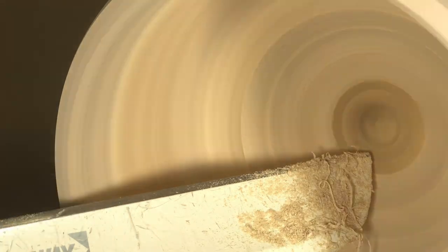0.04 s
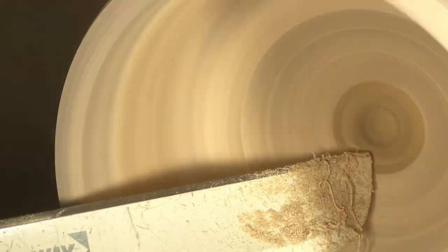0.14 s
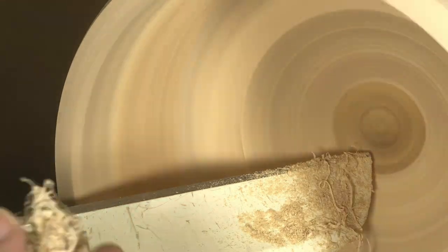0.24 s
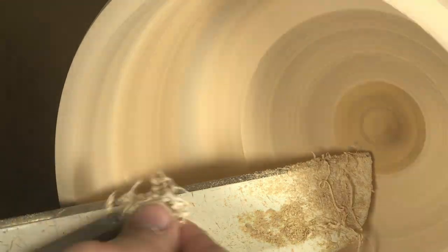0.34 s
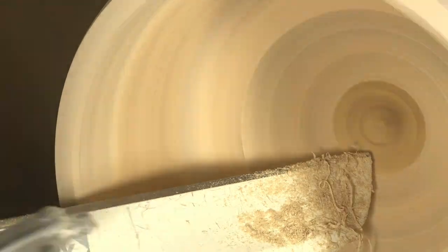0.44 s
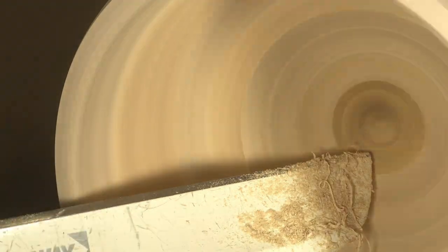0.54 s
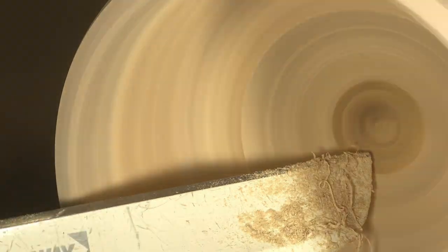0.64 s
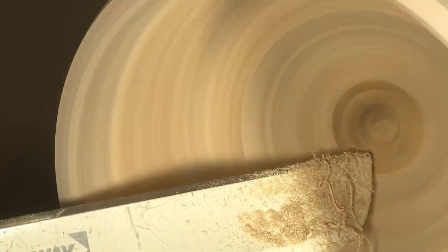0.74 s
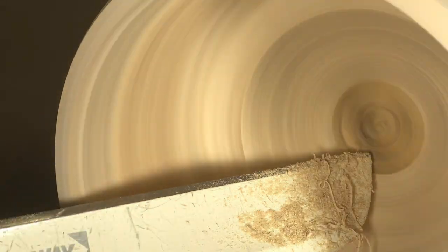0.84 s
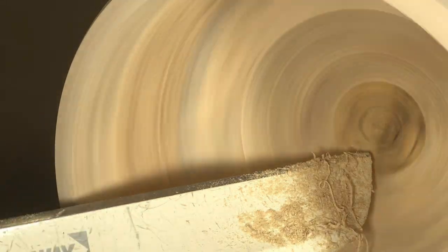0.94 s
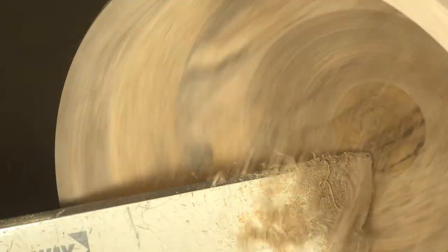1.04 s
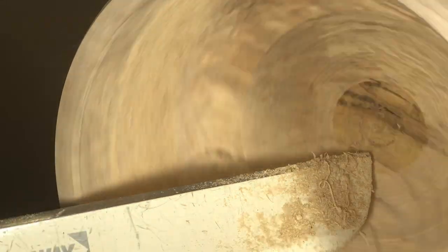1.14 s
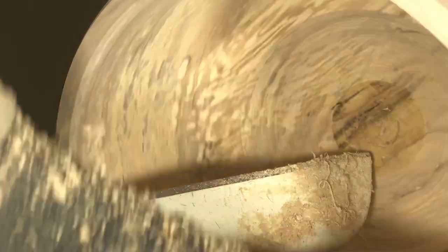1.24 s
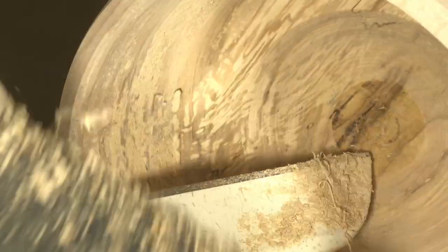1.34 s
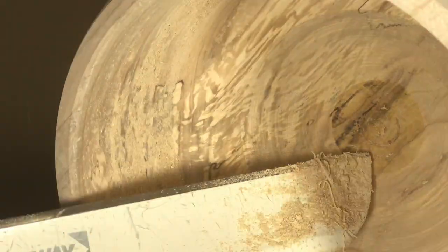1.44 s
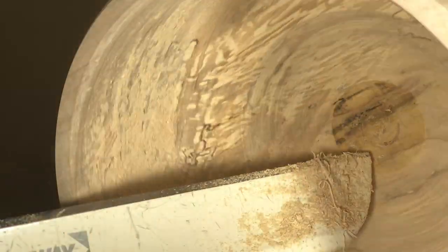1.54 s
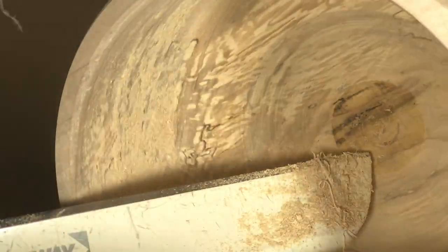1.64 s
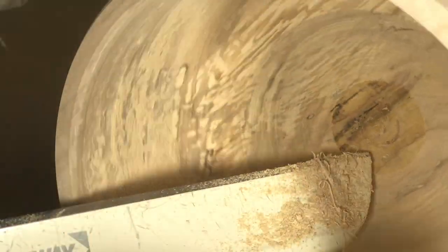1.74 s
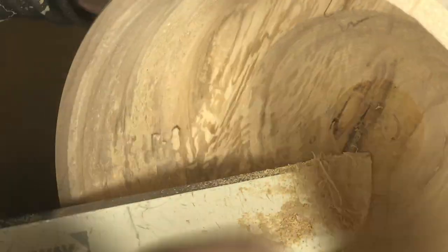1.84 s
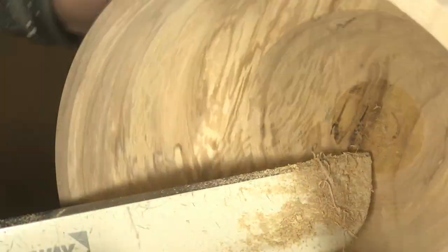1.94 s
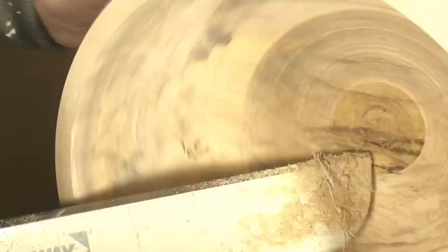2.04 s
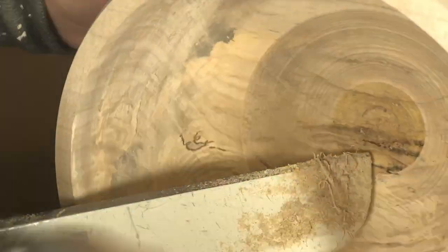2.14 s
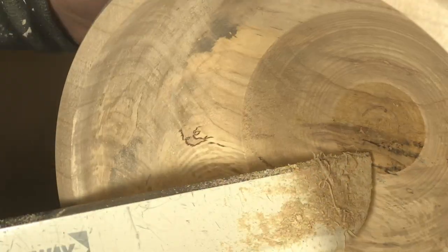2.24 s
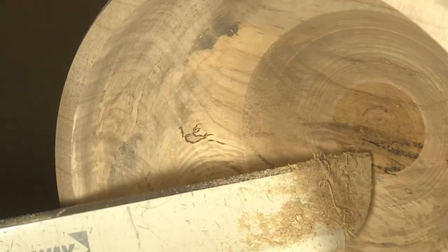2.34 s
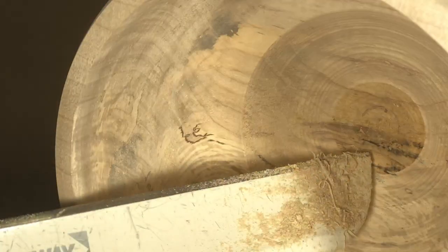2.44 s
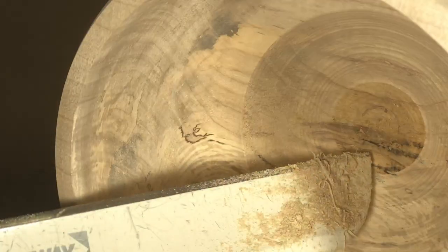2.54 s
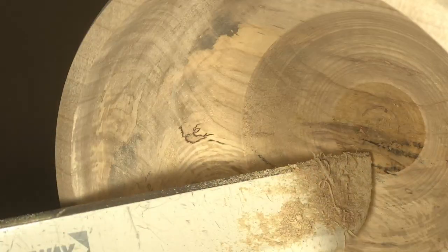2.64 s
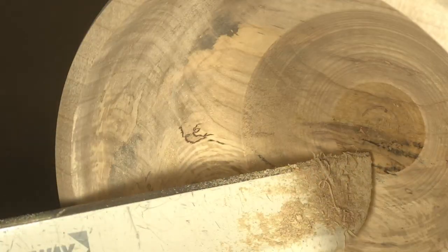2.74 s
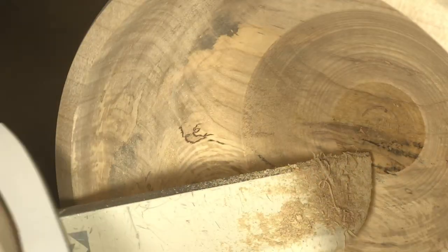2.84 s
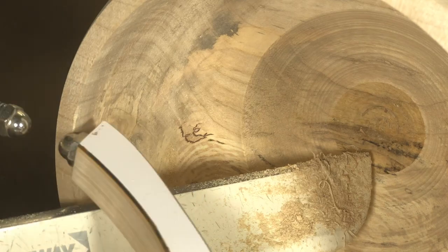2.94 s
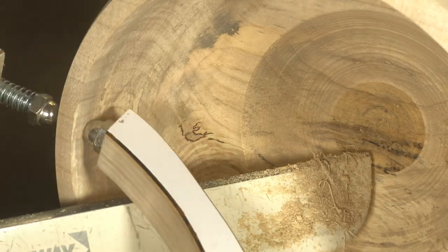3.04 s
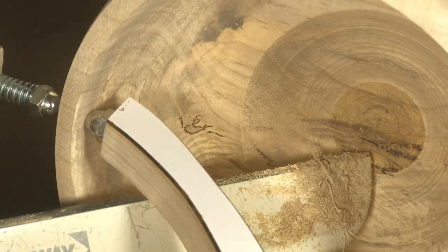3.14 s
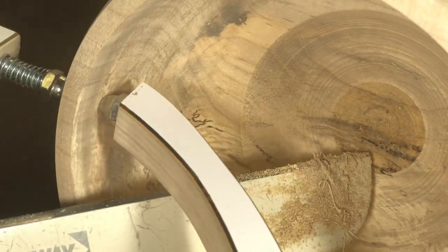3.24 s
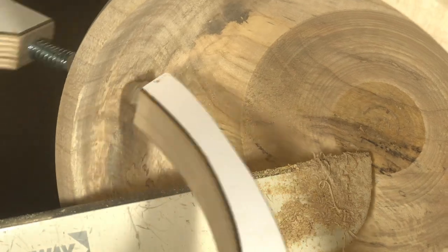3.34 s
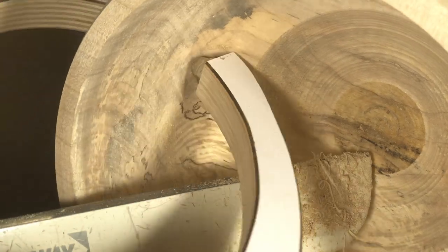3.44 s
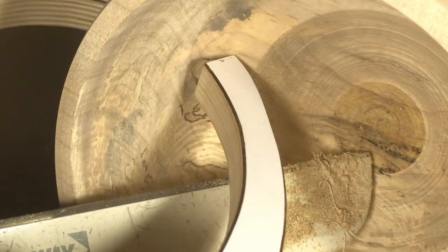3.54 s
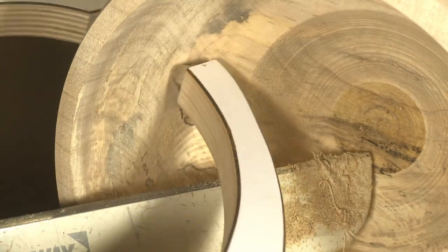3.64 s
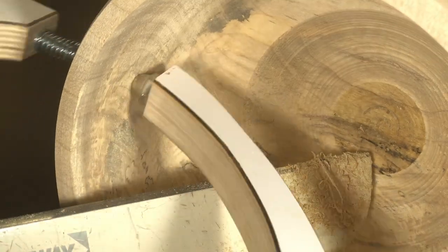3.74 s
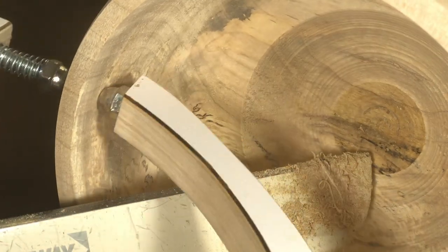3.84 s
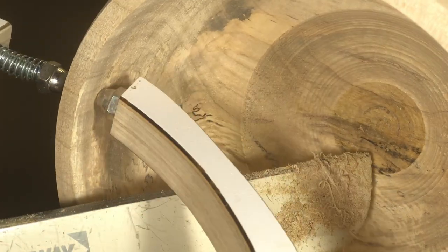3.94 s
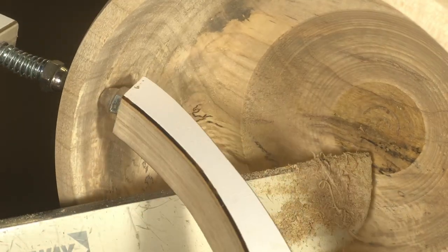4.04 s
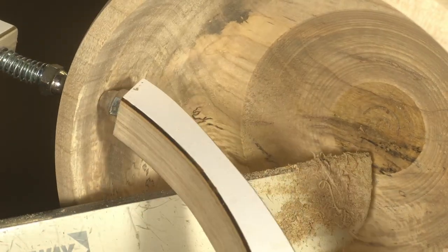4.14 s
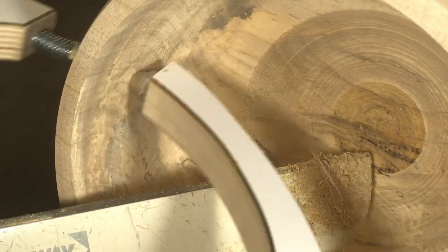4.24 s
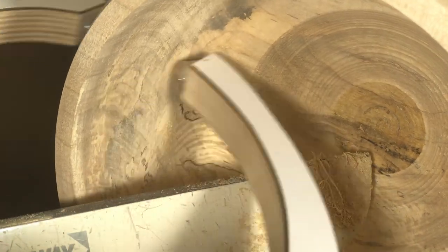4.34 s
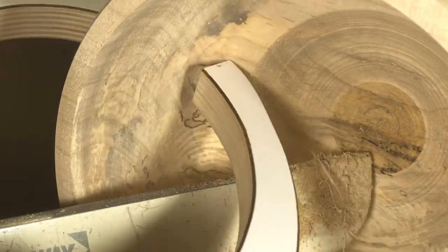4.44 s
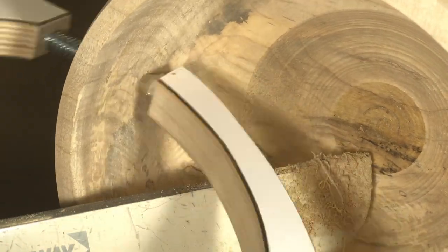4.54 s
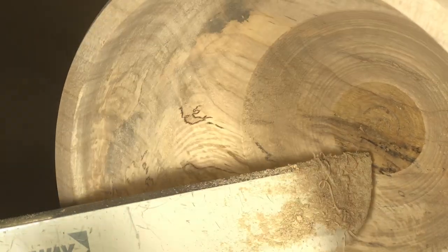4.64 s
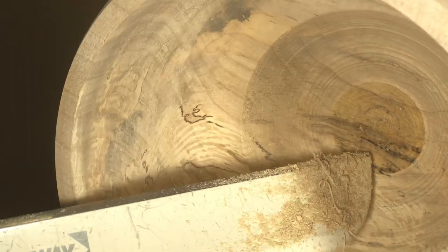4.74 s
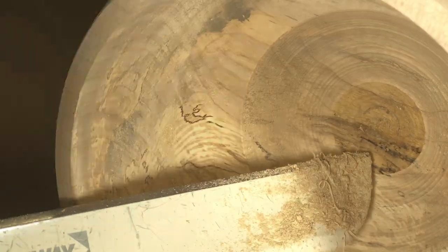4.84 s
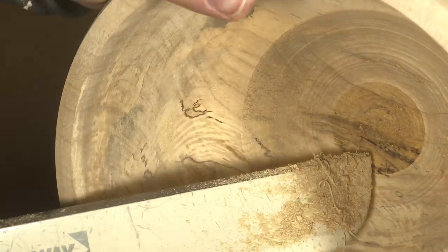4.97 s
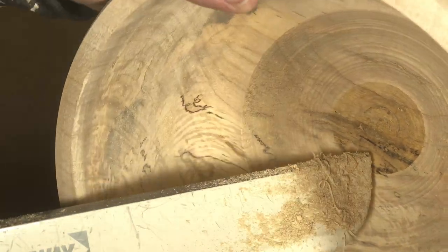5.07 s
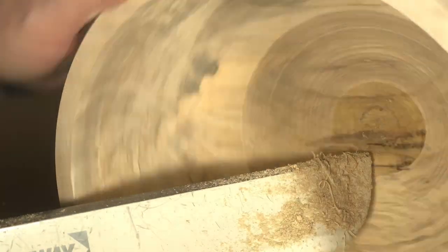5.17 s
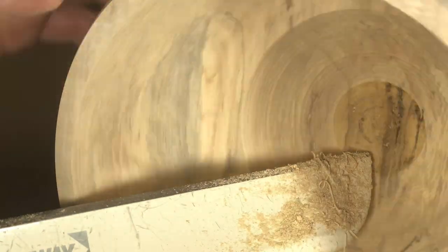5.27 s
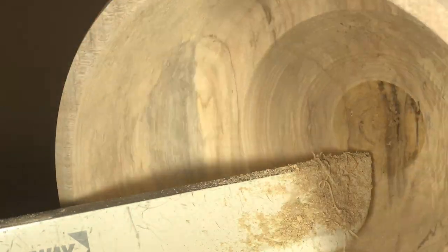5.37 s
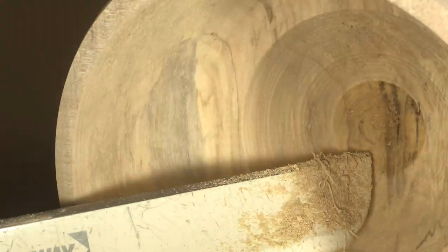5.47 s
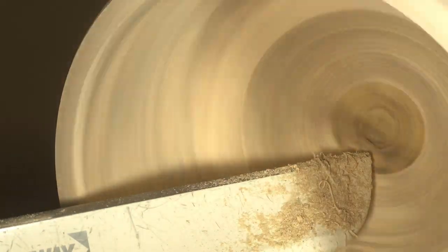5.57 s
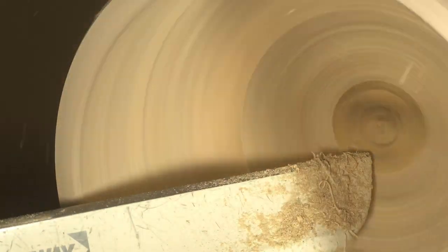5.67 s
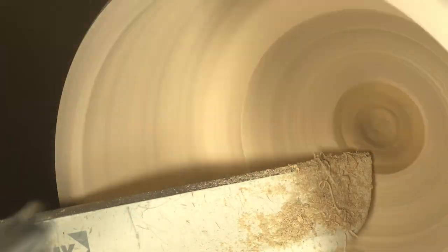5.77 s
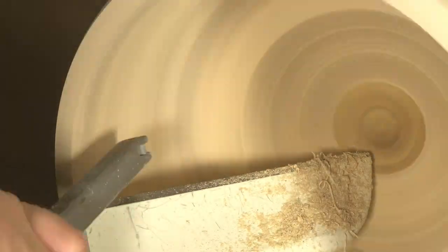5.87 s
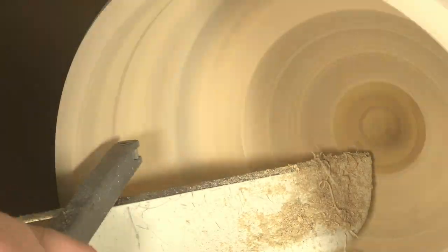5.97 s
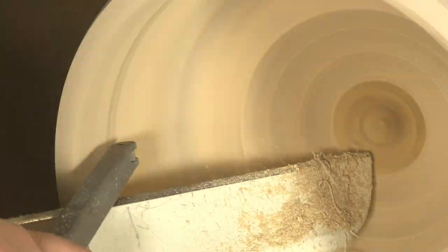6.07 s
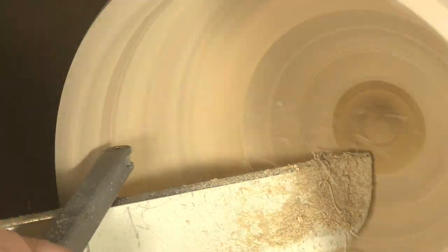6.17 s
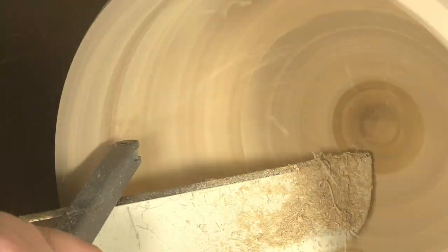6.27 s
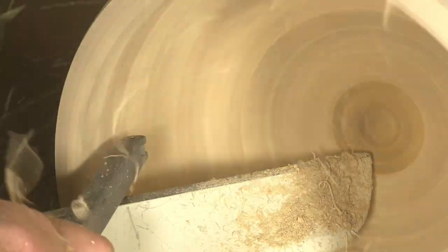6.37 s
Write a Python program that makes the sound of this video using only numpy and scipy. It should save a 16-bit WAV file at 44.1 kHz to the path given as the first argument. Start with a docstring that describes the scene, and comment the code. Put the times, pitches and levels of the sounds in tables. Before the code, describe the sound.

A lathe's rough whirr and airy hiss hold for almost a second, then a sharp switch click and a falling whine lead into near silence. Short bristly swishes, dull palm rubs, dry ticks and wooden knocks follow, with tiny high squeaks. Then the motor starts again, rising fast to full speed, and steel rattles harshly on wood. Near microphone, dry small room, low air behind.

```python
"""A small workshop, the microphone near a wood lathe that coasts down to near silence and runs up again.
The drive gives hum, whirr, throbbing hiss, a gliding belt whine and ringing castings.
Between the runs a brush sweeps shavings from a bowl, hands slide over it, and a caliper taps, scrapes
and squeaks along its wall: filtered noise for rubs and hits, decaying modes for knocks and pings.
A gouge then chatters, its rattle repeating with each drive cycle; a short room and low air lie behind."""
import sys
import numpy as np
from scipy import signal
from scipy.fft import rfft, irfft, next_fast_len
from scipy.io import wavfile
from scipy.ndimage import uniform_filter1d, map_coordinates

SR = 44100
rng = np.random.default_rng(int(sys.argv[2]) if len(sys.argv) > 2 else 0)


def waveform_to_disk(signal):
    """Save audio, clipped to [-1, 1], as 16-bit WAV at the path in sys.argv[1]."""
    frames = np.transpose(np.atleast_2d(signal))
    scaled = np.clip(frames, -1, 1) * 32767
    samples = np.round(scaled).astype(np.int16)
    wavfile.write(sys.argv[1], SR, samples)


N = 282681

# The drive's vibration as the lathe coasts down, idles very low and runs up.
# Each row: time in seconds, rate in Hz.
DRIVE_RATE = [(0, 112.1), (.64, 112.1), (.8, 96), (.92, 85), (1, 69), (1.2, 48), (1.5, 5), (5.48, 5),
              (5.57, 69), (5.65, 84), (5.79, 98), (5.9, 111.21), (6.41, 111.21)]
FULL_RATE_HZ = 112.1


def drive_cycles(waver=.0003):
    """Running count of the drive's vibration cycles, with a slight waver in rate."""
    return np.cumsum(curve(DRIVE_RATE) * (1 + waver * wobble(25))) / SR


def speed():
    """The spindle's speed as a share of full speed."""
    return np.clip(curve(DRIVE_RATE) / FULL_RATE_HZ, .001, 1)


def running(full_db, drop_db, drop_power=1.68):
    """Gain of a noise that dies away as the spindle slows, gently at first."""
    return amp(full_db - drop_db * (1 - speed()) ** drop_power)


# The drive's hum. Each row: multiple of the vibration rate, relative level in dB.
HUM_PARTIALS = [(1, -15.5), (2, -6), (3, -10.5), (4, -12), (5, -8), (6, -4.5), (7, -10), (8, -8.5),
                (9, -19), (10, -2), (11, 4.5), (12, 0.5), (13, -24), (14, -1.5), (15, -3), (16, -3),
                (17, -2), (18, -46.5), (19, -46.5), (20, -6), (21, -1.5)]


def hum(cycles):
    """The drive's vibration makes a harmonic hum that follows its rate."""
    turn = 2 * np.pi * cycles
    partials = [amp(db) * np.sin(k * turn + rng.uniform(0, 2 * np.pi)) for k, db in HUM_PARTIALS]
    return running(full_db=-52, drop_db=360) * unit(sum(partials))


# Broad whirr of the lathe. Each row: frequency in Hz, relative density in dB per Hz.
WHIRR_SPECTRUM = [(88, -38), (150, -23), (258, -19), (310, -10), (475, -14.5), (659, -12.5), (954, -14.5),
                  (1200, -6), (1480, -14.5), (1850, -10.5), (2310, -5.5), (4500, -13), (5850, -18.5),
                  (9900, -52)]
# Resonances of the lathe's frame. Each row: frequency in Hz, width in Hz, relative level in dB.
FRAME_MODES = [(611.5, 4.7, -3.5), (1172, 40, -2.5), (1212, 10, -7), (1360, 30, 3), (1655, 23, 2),
               (1840, 17, -4), (1896, 16, 3.5), (1940, 8.6, -23), (2274, 50, 7.5), (2365, 31, 6.5),
               (2796, 22, 2), (3580, 7.8, -5)]


def whirr():
    """The bearings shake the frame: a broad rough noise and the frame's own modes, kept ringing."""
    broad = friction(colour(WHIRR_SPECTRUM), grain_db=1.5, grain_rate=170)
    return running(full_db=-44.5, drop_db=81) * amp(-4) * (broad + ringing(FRAME_MODES))


# The lathe's hiss. Each row: frequency in Hz, relative density in dB per Hz.
HISS_SPECTRUM = [(2500, -14), (3800, -13), (5200, -2.5), (6100, -6.5), (6900, 1.5), (9000, 0),
                 (12500, -3.5), (13600, -4), (14600, -0.5), (15500, -2)]
# Resonances in the hiss. Each row: frequency in Hz, width in Hz, boost in dB.
HISS_RESONANCES = [(8450, 200, 9), (9550, 200, -6), (10220, 560, 8), (11520, 450, 6)]


def hiss(cycles, grain_db=1.0):
    """A bright rubbing noise that throbs once per drive cycle."""
    turn = 2 * np.pi * cycles
    throb_db = 2.7 * np.cos(turn) + 1.1 * np.cos(2 * turn)
    rubs = rng.standard_normal(N) * amp(throb_db + grain_db * wobble(500))
    return running(full_db=-42.5, drop_db=124) * unit(filtered(rubs, colour(HISS_SPECTRUM, HISS_RESONANCES)))


def lathe(cycles):
    """Hum, whirr and hiss of the drive and bearings together."""
    return hum(cycles) + whirr() + hiss(cycles)


def belt(smear_hz=60, full_pitch_hz=2930, level_db=-52.5, resonance_hz=2490, width_hz=280):
    """A fuzzy whine glides with the spindle's speed, loudest as it passes the belt's resonance."""
    pitch = full_pitch_hz * speed()
    turn = 2 * np.pi * np.cumsum(pitch) / SR
    gain = amp(level_db) / (1 + (2 * (pitch - resonance_hz) / width_hz) ** 2)
    return gain * unit(wobble(2 * smear_hz) * np.sin(turn) + wobble(2 * smear_hz) * np.cos(turn))


def bed(mode_hz=309.4, level_db=-60, onset=0.46, lag_s=0.15):
    """The bed's lowest mode rings above a share of full speed, taking a moment to build and fade."""
    shaken = amp(level_db) / (1 + (onset / speed()) ** 8)
    keep = np.exp(-1 / (lag_s * SR))
    built_up = signal.lfilter([1 - keep], [1, -keep], shaken, zi=shaken[:1])[0]
    return built_up * singing([(mode_hz, 0)], waver_db=2, waver_rate=20)


# Modes of the motor housing. Each row: frequency in Hz, relative level in dB.
HOUSING_MODES = [(315, -5), (628, -8), (667, 0), (790, -10), (2026, -11)]
# Swells of the housing while the speed changes.
# Each row: start of the hold in seconds, hold in seconds, level in dB, attack in seconds.
HOUSING_SWELLS = [(0.843, 0.14, -54.5, .16), (5.59, .004, -51, 0.013), (5.75, 0.26, -59, 0.12)]


def housing():
    """The motor housing's lightly damped modes sing in swells while the speed changes."""
    strain = sum(amp(db) * stroke(s, hold, attack, release=0.098)
                 for s, hold, db, attack in HOUSING_SWELLS)
    return strain * singing(HOUSING_MODES, waver_db=1.5, waver_rate=25, drift_cycles=0.09)


# The gouge touches three times, then bites and sinks into the cut.
# Each row: start of the hold in seconds, hold in seconds, chatter level in dB, attack in seconds.
GOUGE_TOUCHES = [(5.959, .018, -37, 0.011), (6.012, .008, -47, 0.0047), (6.079, 0.063, -37, .004),
                 (6.203, .25, -35.5, 0.031), (6.354, .15, -29, .14)]
# The gouge's steel. Each row: frequency in Hz, relative density in dB per Hz.
STEEL_SPECTRUM = [(1000, -14), (2600, -15), (3800, -20), (5600, -15), (6100, -2.5), (7200, 2.5),
                  (7900, -0.5), (9000, -4), (10400, 2.5), (11100, -9.5), (11600, 5), (12200, 2.5),
                  (13500, 11), (15600, 3)]
# Resonances of the steel. Each row: frequency in Hz, width in Hz, boost in dB.
STEEL_RESONANCES = [(2914, 250, 19), (3210, 310, 21.5), (6250, 313, 9), (6449, 60, -6), (6901, 70, 8),
                    (7564, 70, -7), (8780, 370, 15.5), (9464, 70, -1), (10120, 120, -2), (10530, 80, 15),
                    (12200, 70, 2), (12700, 70, 1), (13910, 90, 5), (14239, 90, 4), (14460, 680, -10.5)]


def gouge(cycles, loose_db=-4.5, uneven_db=2.5, order=142, size=8192):
    """Every cycle repeats nearly the same rattle of the steel; torn fibres add fresh noise."""
    partials = amp(uneven_db * rng.standard_normal(order)) * np.exp(2j * np.pi * rng.random(order))
    one_cycle = unit(irfft(np.append(0, partials), size))
    # each slip comes a little early or late, which blurs the highest partials
    slip = cycles + .0011 * wobble(45)
    rattle = np.interp(slip % 1, np.arange(size) / size, one_cycle)
    # fibres tear hardest at one point of the cycle
    bite = amp(3.5 * np.cos(2 * np.pi * cycles) + 2.5 * wobble(600))
    fibres = amp(loose_db) * bite * rng.standard_normal(N)
    pressure = amp(0.55 * wobble(60))
    depth = sum(amp(db) * stroke(s, hold, attack, release=0.015) for s, hold, db, attack in GOUGE_TOUCHES)
    return depth * unit(filtered((rattle + fibres) * pressure, colour(STEEL_SPECTRUM, STEEL_RESONANCES)))


# Brush strokes over the wood. Each row: start of the hold in seconds, hold in seconds, level in dB.
BRUSH_STROKES = [(1.295, 0.0019, -42), (1.386, 0.0033, -34.5), (1.598, .004, -38), (1.647, 0.0041, -47),
                 (1.725, 0.024, -46), (1.833, 0.0091, -36), (1.916, 0.0063, -34.5), (2.068, .02, -40),
                 (2.156, 0.0078, -39)]
# The bristles. Each row: frequency in Hz, relative density in dB per Hz.
BRISTLE_SPECTRUM = [(300, -0.5), (1000, -3), (3000, -8.5), (4200, -13), (6000, -2), (8300, -1.5),
                    (10000, 0), (11500, 4.5), (13500, 1), (15600, 10)]
# Resonances of the bristles. Each row: frequency in Hz, width in Hz, boost in dB.
BRISTLE_RESONANCES = [(3224, 56, 21), (7270, 530, 10), (10200, 370, 16), (12240, 1100, 7), (13700, 610, 6)]


def brush():
    """Bristles slip over the wood in strokes that swell and then leave it quickly."""
    drag = friction(colour(BRISTLE_SPECTRUM, BRISTLE_RESONANCES), grain_db=2.0, grain_rate=460)
    return strokes(BRUSH_STROKES, attack=0.021, release=0.0059) * roving(drag, depth_db=3.5)


# Hands slide on the bowl, dull when flat on the wood, bright when they skim it.
# Each row: start of the hold in seconds, hold in seconds, level in dB, extra treble in dB.
HAND_SLIDES = [(1.258, 0.032, -56, 6), (1.39, .04, -59, -3), (1.47, 0.093, -53.5, -4),
               (1.591, .12, -57, -5), (1.776, 0.2, -60, -18), (2.03, 0.18, -59, -16),
               (2.228, 0.081, -56.5, -1.5), (2.352, 0.042, -58.5, 4), (2.431, 0.073, -61, -3),
               (2.731, 0.014, -60.5, 5), (2.79, 0.205, -62, -3), (4.662, .15, -58, 0),
               (4.925, 0.058, -56.5, 0), (5.041, 0.073, -58, 4), (5.152, 0.012, -53, 7.5),
               (5.199, 0.066, -56.5, -3), (5.297, 0.095, -65, -11), (5.41, 0.0027, -45.5, 0),
               (5.467, 0.027, -63, -3), (5.526, 0.011, -52.5, -9)]
# Skin on wood. Each row: frequency in Hz, relative density in dB per Hz.
SKIN_SPECTRUM = [(300, -17), (900, -9.5), (1800, -1.5), (4200, -4), (6500, -2.5), (8500, -3), (10500, -3),
                 (12500, -1.5), (15600, -3.5)]
# Resonances under the skin. Each row: frequency in Hz, width in Hz, boost in dB.
SKIN_RESONANCES = [(2300, 71, 3.5), (2970, 240, 6), (12200, 710, 1)]


def hands(crumb_db=-9, bump_db=-12, attack_s=0.034, release_s=0.023):
    """Fingers drag over the wood, dry crumbs crackle under them, and bumps shake the whole bowl."""
    crumb_colour = colour([(1000, -30), (4000, -1), (14000, -2)])
    crumbs = friction(crumb_colour, grain_db=9.5, grain_rate=1100)
    drag = friction(colour(SKIN_SPECTRUM, SKIN_RESONANCES), grain_db=2.5, grain_rate=280)
    skin = roving(drag + amp(crumb_db) * crumbs, depth_db=4.5)
    treble = filtered(skin, lambda hz: 1 - 1 / (1 + (hz / 8000) ** 4))
    bump_colour = colour([(110, -1.0), (220, 6.5), (600, -0.5), (1200, -1.5), (3000, -12)])
    bumps = friction(bump_colour, grain_db=3.2, grain_rate=70)
    press = strokes([(s, hold, db) for s, hold, db, _ in HAND_SLIDES], attack_s, release_s)
    skim_rows = [(s, hold, db + treble_db) for s, hold, db, treble_db in HAND_SLIDES]
    skim = strokes(skim_rows, attack_s, release_s)
    return press * (skin - treble + amp(bump_db) * bumps) + skim * treble


# The caliper's body. Each row: frequency in Hz, relative density in dB per Hz.
CALIPER_SPECTRUM = [(200, -50), (650, 8), (1500, -0.5), (3300, -10), (4300, 1.5), (5300, 7), (6400, -3.5),
                    (7100, 3.5), (8800, -4.5), (11200, 0.5), (13400, 3.5), (15600, 2.5)]
# Resonances of the caliper. Each row: frequency in Hz, width in Hz, boost in dB.
CALIPER_RESONANCES = [(2010, 26, 18.5), (2330, 144, 24), (2914, 500, 17), (4330, 370, 6),
                      (10420, 380, 13.5)]
# The tip slides along the wall. Each row: start of the hold in seconds, hold in seconds, level in dB.
TIP_SLIDES = [(2.99, 0.1, -64.5), (3.195, 0.082, -71), (3.307, 0.016, -61.5), (3.374, 0.017, -52.5),
              (3.417, 0.028, -52.5), (3.51, 0.0059, -57), (3.66, 0.068, -62), (3.755, 0.042, -55),
              (3.82, 0.062, -70), (4.185, 0.073, -69), (4.269, 0.0068, -56.5), (4.314, 0.012, -63),
              (4.365, 0.015, -46.5), (4.52, 0.054, -59), (4.583, 0.041, -50.5)]


def caliper_scrape():
    """The caliper's tip slips over the grain and excites the caliper's resonances."""
    drag = friction(colour(CALIPER_SPECTRUM, CALIPER_RESONANCES), grain_db=2, grain_rate=720)
    return strokes(TIP_SLIDES, attack=0.018, release=0.015) * roving(drag, depth_db=4.5)


# The tip sticks and slips. Each row: centre in seconds, pitch in Hz, peak of the fundamental in dB,
# time from the centre to a fall of 1/e in seconds, level of the octave against the fundamental in dB.
TIP_SQUEAKS = [(3.6155, 6026, -27, 0.004, -16), (3.622, 6150, -29.5, 0.0036, -7.5),
               (4.32, 2860, -53, 0.0057, -20), (4.481, 6200, -34.5, 0.0023, -25)]


def squeaks():
    """Brief swelling whistles as the tip sticks and slips, each with its octave."""
    track = np.zeros(N)
    for s, hz, db, length, octave_db in TIP_SQUEAKS:
        t = np.arange(N) / SR - s
        turn = 2 * np.pi * hz * t
        swell = amp(db) * np.exp(-(t / length) ** 2)
        track += swell * (np.sin(turn) + amp(octave_db) * np.sin(2 * turn))
    return track


# The caliper taps the wall. Each row: start in seconds, relative peak in dB, brightest band in Hz,
# fall either side of it in dB per octave, ring t60 in seconds, ring level against the crack in dB.
CALIPER_TAPS = [(2.9646, -38.5, 880, 4, .025, 9), (3.0209, -19, 9800, 5.5, 0.011, -19),
                (3.0523, -36.5, 6000, 0.5, 0.022, 7), (3.1483, -41.5, 9650, 17, 0.02, -4),
                (3.1891, -42.5, 14000, 2, 0.038, 7), (3.4511, -37, 2360, 9.5, 0.03, -12),
                (3.9748, -28, 11900, 6, 0.026, -12), (4.3807, -27.5, 2300, 3, 0.018, 2)]


def caliper_taps(level_db=1):
    """Hard taps of the caliper, coloured by its own resonances."""
    body = colour(CALIPER_SPECTRUM, CALIPER_RESONANCES)
    return amp(level_db) * contacts(CALIPER_TAPS, body, crack_t60=0.0039)


# Switches, chips and handled tools. Each row: start in seconds, relative peak in dB, brightest band in Hz,
# fall either side of it in dB per octave, ring t60 in seconds, ring level against the crack in dB.
TOOL_CLICKS = [(.8787, -20, 7500, 32, 0.015, 7), (.8793, -18, 15200, 61, 0.026, 5),
               (.8875, -27, 3500, 6, 0.11, -7.5), (.945, -32, 12000, -1, 0.043, -15),
               (1.0278, -37.5, 2560, 55, 0.022, 7), (1.1935, -50, 5470, 8, 0.028, 1.5),
               (1.2718, -30, 14500, 25, .01, -16), (1.5294, -34.5, 14400, -2, 0.0097, -18),
               (1.854, -45, 11000, -4.5, .015, -3), (2.261, -40.5, 8000, 6, .015, -7),
               (2.5277, -32.5, 5230, 7.5, 0.049, 19), (2.857, -44, 12000, 0, 0.019, -6),
               (2.889, -25, 12600, 6, 0.045, 5), (2.892, -30, 2760, 9, 0.058, 19),
               (4.7959, -37, 4000, 5, 0.051, 4), (4.833, -14, 9700, 6.5, 0.032, -3),
               (5.2276, -42.5, 8850, 10, 0.059, 8), (5.3828, -37, 2960, 5, 0.091, 25),
               (5.5419, -26.5, 3000, 2.5, 0.066, 25), (5.9436, -21.5, 8100, 47, 0.0088, 2),
               (6.0773, -29, 6840, 38, .02, -18)]


def clicks(level_db=1):
    """Switches, chips and handled tools click through a broad body that loses its top treble."""
    body = colour([(300, 2.5), (2000, 1.0), (9000, -1), (15500, -4), (17500, -34)])
    return amp(level_db) * contacts(TOOL_CLICKS, body, crack_t60=0.0059)


def contacts(rows, body, crack_t60, size=8192):
    """Hard contacts: a sharp crack and a dense ring, weighted around each one's brightest band."""
    track, t = np.zeros(N), np.arange(size) / SR
    for s, db, bright_hz, fall_db, t60, ring_db in rows:
        decay = amp(-60 * t / crack_t60) + amp(ring_db - 60 * t / t60)
        burst = rng.standard_normal(size) * decay
        # a weak floor keeps the far bands from vanishing
        hardness = lambda hz: amp(-fall_db * np.abs(np.log2((hz + 1) / bright_hz))) + amp(-31.0)
        hit = causal(burst, lambda hz: body(hz) * hardness(hz))
        add(track, s, amp(db) * hit / np.abs(hit).max())
    return track


# Dull knocks on the bowl. Each row: start in seconds, peak in dB, brightest band in Hz.
BOWL_KNOCKS = [(1.261, -52, 1100), (1.3635, -42.5, 1110), (1.476, -45, 620), (1.646, -48, 705),
               (1.909, -54, 600), (2.275, -49, 1490), (2.560, -41, 1800), (2.572, -44, 420),
               (2.890, -46, 795), (2.965, -45, 670), (3.415, -44.5, 880), (3.451, -40.5, 690),
               (4.382, -41, 704), (4.836, -36, 2290), (5.384, -41, 2100), (5.392, -47, 474),
               (5.546, -41, 490)]
# Modes of the wooden bowl. Each row: frequency in Hz, relative level in dB, t60 in seconds.
BOWL_MODES = [(105, -17.5, 0.31), (448, -11, 0.11), (670, 0, 0.011), (868, -15.5, 0.082),
              (1174, -13, 0.093), (1570, -5.5, 0.013), (2050, -9.5, 0.11)]


def knocks(attack_s=0.00022, thud_db=2, fall_db=9, size=8192):
    """Soft blows ring the wooden bowl; where each one lands decides which modes answer most."""
    track, t = np.zeros(N), np.arange(size) / SR
    thud_colour = colour([(150, -27), (600, -3.0), (1800, -5), (5000, -3.5)])
    for s, db, bright_hz in BOWL_KNOCKS:
        ring = np.zeros(size)
        for hz, mode_db, t60 in BOWL_MODES:
            luck_db = rng.normal(0, 3)
            decay = amp(mode_db + luck_db - 60 * t / t60)
            ring += decay * np.sin(2 * np.pi * (hz * t + rng.random()))
        thud = unit(filtered(rng.standard_normal(size), thud_colour)) * amp(thud_db - 60 * t / 0.09)
        spot = lambda hz: amp(-fall_db * np.abs(np.log2((hz + 1) / bright_hz)))
        hit = causal((ring + thud) * (1 - np.exp(-t / attack_s)), spot)
        add(track, s, amp(db) * hit / np.abs(hit).max())
    return track


# Small steel parts ring on after a click.
# Each row: start in seconds, frequency in Hz, starting level in dB, t60 in seconds.
STEEL_PINGS = [(1.028, 2860, -66.5, 0.95), (2.527, 9200, -42, 0.028), (2.889, 11100, -54, 0.26),
               (3.021, 4290, -30.5, 0.01), (5.54, 3000, -45, 0.06)]


def pings():
    """One lightly damped mode of each small steel part."""
    track, t = np.zeros(N), np.arange(SR // 2) / SR
    for s, hz, db, t60 in STEEL_PINGS:
        add(track, s, amp(db - 60 * t / t60) * np.sin(2 * np.pi * hz * t))
    return track


# The workshop's reverberation. Each row: frequency in Hz, t60 in seconds.
SHOP_DECAY = [(200, 0.25), (2000, 0.16), (12000, 0.012)]


def shop(x):
    """The workshop's short answer, 180 samples (4 ms) late; treble dies first."""
    hz, t, z = signal.stft(rng.standard_normal(SR // 2), SR, nperseg=256)
    decay = amp(-60 * t / along(SHOP_DECAY, hz)[:, None])
    tail = signal.istft(z * decay, SR, nperseg=256)[1]
    return signal.fftconvolve(np.pad(x, (180, 0)), tail / np.linalg.norm(tail))[:N]


# The low rush of the room. Each row: frequency in Hz, relative density in dB per Hz.
AIR_SPECTRUM = [(15, -73), (25, -35), (205, 1.5), (403, 6.5), (542, -2.5), (604, -2), (981, -10.5),
                (2150, -11), (2330, -13), (3390, -14.5), (5230, -17.5), (8970, -21.5), (10300, -20.5),
                (13400, -20), (15800, -27)]


def air(level_db=-64):
    """The room's low rush: steady coloured noise with a slow, slight waver."""
    return amp(level_db) * friction(colour(AIR_SPECTRUM), grain_db=1.16, grain_rate=8)


def friction(response, grain_db, grain_rate):
    """Clumps of tiny slips through a body's resonances, rms 1."""
    return unit(filtered(rng.standard_normal(N) * amp(grain_db * wobble(grain_rate)), response))


def roving(x, depth_db, size=512):
    """The colour shifts in patches as the contact point moves over the grain, rms 1."""
    z = signal.stft(x, nperseg=size)[2]
    field = uniform_filter1d(rng.standard_normal(z.shape), size=9, axis=0)
    field = uniform_filter1d(field, size=7, axis=1)
    return unit(signal.istft(z * amp(depth_db * unit(field)), nperseg=size)[1][:N])


def ringing(modes):
    """Narrow resonances (Hz, width Hz, dB) kept ringing by random shaking, rms 1."""
    def response(f):
        total = 0
        for k, (centre, width, db) in enumerate(modes):
            resonance = 1j * f * width / (centre ** 2 - f ** 2 + 1j * f * width)
            # neighbouring modes alternate in sign
            total = total + amp(db) / np.sqrt(width) * resonance * (-1) ** k
        return total
    return unit(filtered(rng.standard_normal(N), response))


def singing(modes, waver_db, waver_rate, drift_cycles=0):
    """Modes (Hz, dB) ring almost purely, each wavering in level and drifting in phase, rms 1."""
    t = np.arange(N) / SR
    tone = lambda hz: np.sin(2 * np.pi * (hz * t + drift_cycles * wobble(4 * waver_rate)))
    return unit(sum(amp(db + waver_db * wobble(waver_rate)) * tone(hz) for hz, db in modes))


def stroke(s, hold, attack, release):
    """Gain of one gesture: it swells from a tenth, holds from s, and fades to a tenth (all in s)."""
    t = np.arange(N) / SR - s
    away = np.maximum(-t / attack, 0) ** 2 + np.maximum((t - hold) / release, 0) ** 2
    return amp(-20 * np.minimum(away, 10))


def strokes(rows, attack, release):
    """Gain of a run of like gestures (s, hold s, dB); overlapping ones add in power."""
    return np.sqrt(sum((amp(db) * stroke(s, hold, attack, release)) ** 2 for s, hold, db in rows))


def amp(db):
    """Decibels to gain."""
    return 10 ** (np.asarray(db) / 20)


def unit(x):
    """Scale to rms 1."""
    return x / np.sqrt(np.mean(x ** 2) + 1e-20)


def along(points, hz):
    """(Hz, value) points read on a log axis."""
    f, v = np.transpose(points)
    return np.interp(np.log(hz + 1), np.log(f + 1), v)


def curve(rows):
    """A (s, value) table, one value per sample."""
    return np.interp(np.arange(N) / SR, *np.transpose(rows))


def wobble(rate):
    """A smooth random curve, rate knots a second."""
    return map_coordinates(rng.standard_normal(N // 4), [np.arange(N) * rate / SR], mode="wrap")


def filtered(x, response):
    """x times a response of frequency."""
    n = x.shape[-1]
    m = next_fast_len(n + 8192)
    return irfft(rfft(x, m) * response(np.fft.rfftfreq(m, 1 / SR)), m)[..., :n]


def colour(spectrum, peaks=()):
    """Response of a broad spectrum with resonant humps, falling away below its first point."""
    def humps(hz):
        return sum(db / (1 + (2 * (hz - centre) / width) ** 2) for centre, width, db in peaks)
    return lambda hz: amp(along(spectrum, hz) + humps(hz)) * np.minimum(hz / spectrum[0][0], 1) ** 2


def causal(x, response, size=4096):
    """Minimum-phase filter: it rings only after the blow."""
    cepstrum = irfft(np.log(response(np.fft.rfftfreq(size, 1 / SR)) + 1e-6))
    ring = irfft(np.exp(rfft(2 * cepstrum[:size // 2], size) - cepstrum[0]))
    return signal.fftconvolve(x, ring)[:len(x)]


def add(track, s, sound):
    """Mix a sound in at time s."""
    part = track[max(round(s * SR), 0):][:len(sound)]
    part += sound[:len(part)]


def scene(hit_room_db=-21, rub_room_db=-24):
    """Lathe, gouge and hand work over the low rush of the room; only hits and rubs feed the reverberation."""
    cycles = drive_cycles()
    machine = lathe(cycles) + belt() + bed() + housing()
    hits = caliper_taps() + clicks() + knocks() + pings()
    rubs = brush() + hands() + caliper_scrape() + squeaks()
    room = shop(amp(hit_room_db) * hits + amp(rub_room_db) * rubs)
    return (machine + gouge(cycles) + hits + rubs + room + air())[None]


def record(dry, top_hz=15800):
    """The microphone's signal keeps nothing above its band limit."""
    return filtered(dry, lambda hz: hz < top_hz)


dry = scene()
out = record(dry)
waveform_to_disk(out)
```